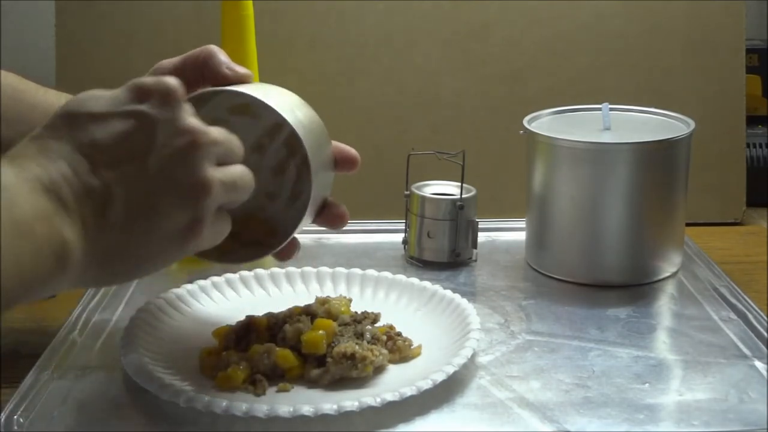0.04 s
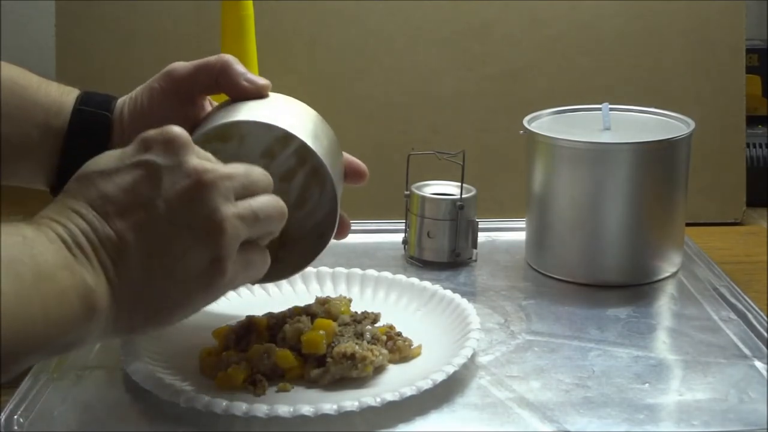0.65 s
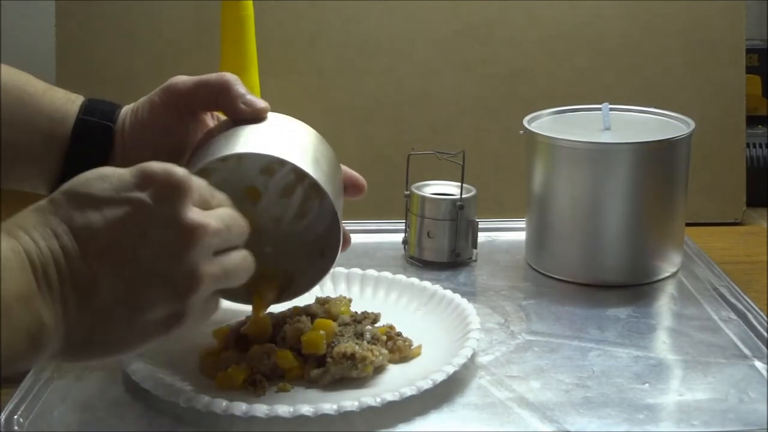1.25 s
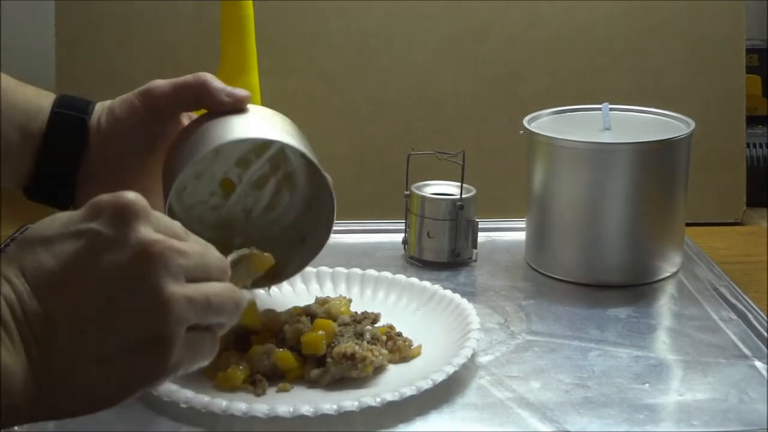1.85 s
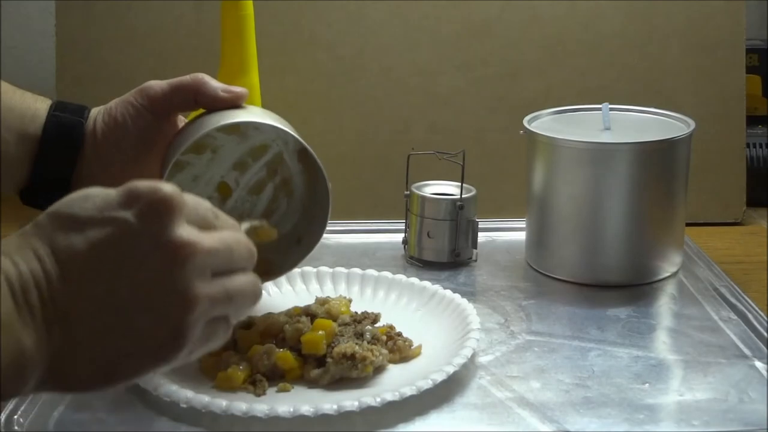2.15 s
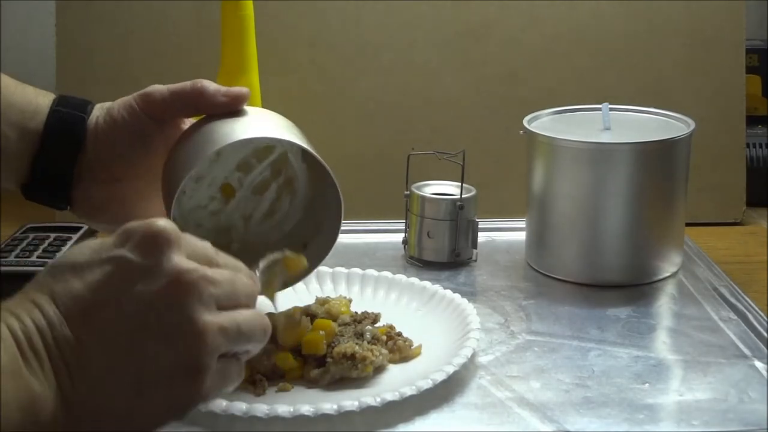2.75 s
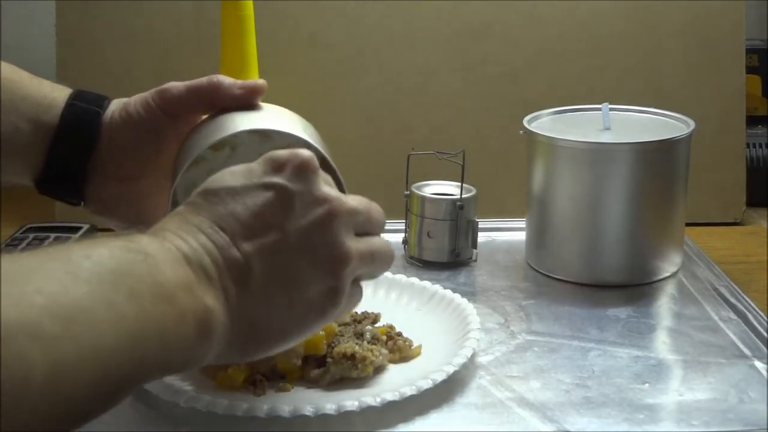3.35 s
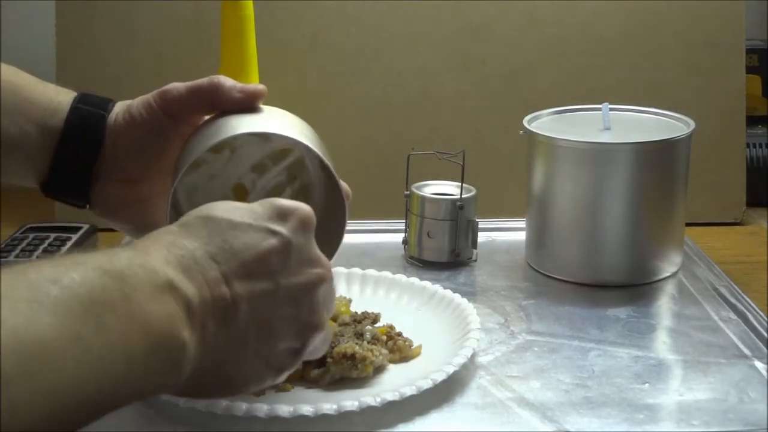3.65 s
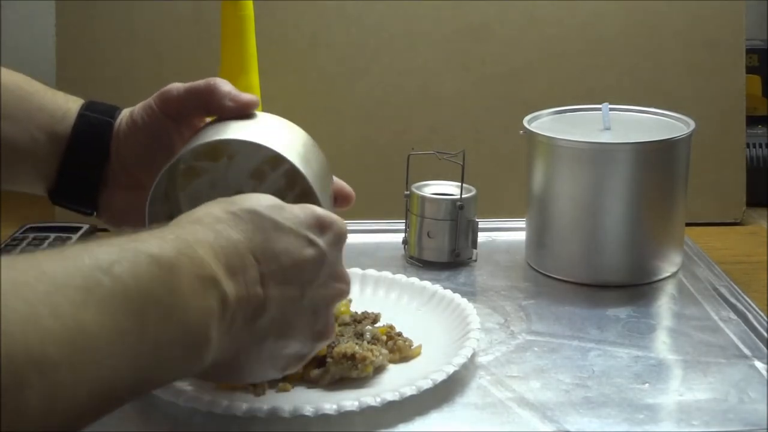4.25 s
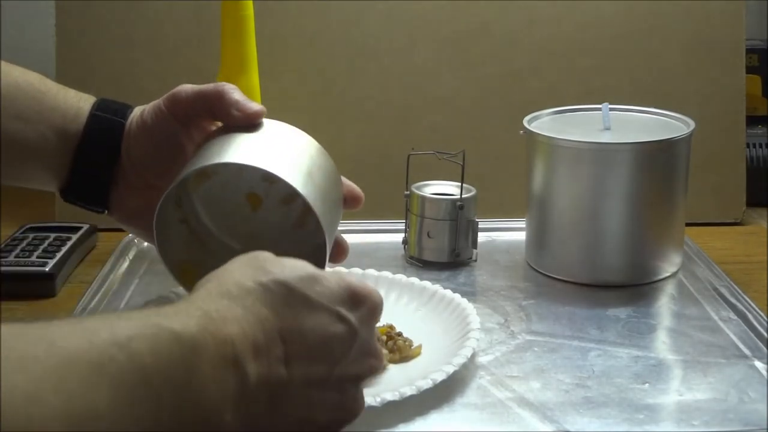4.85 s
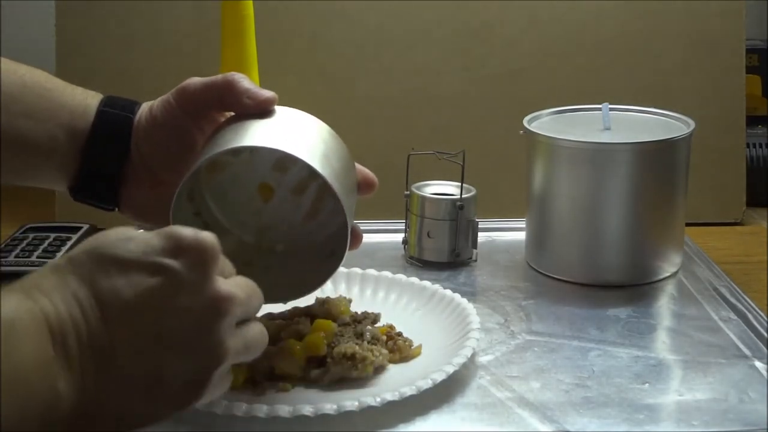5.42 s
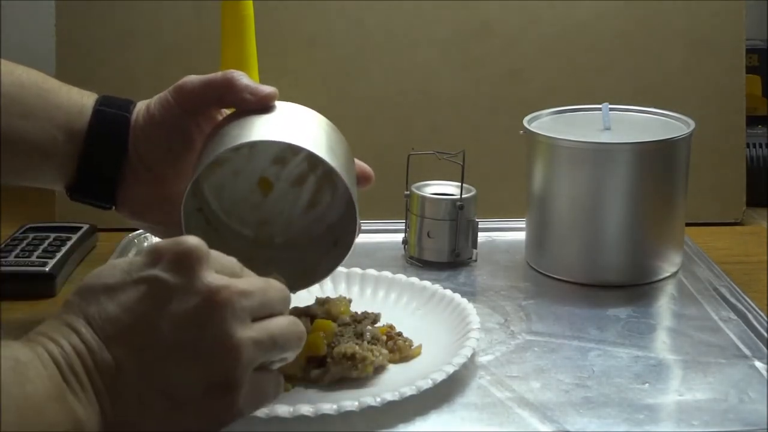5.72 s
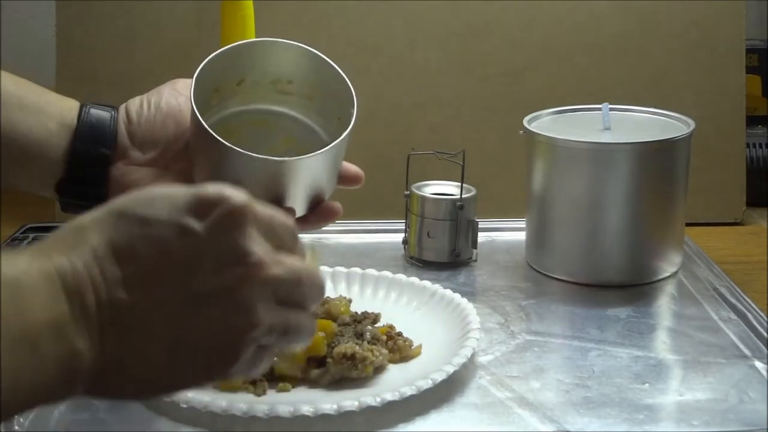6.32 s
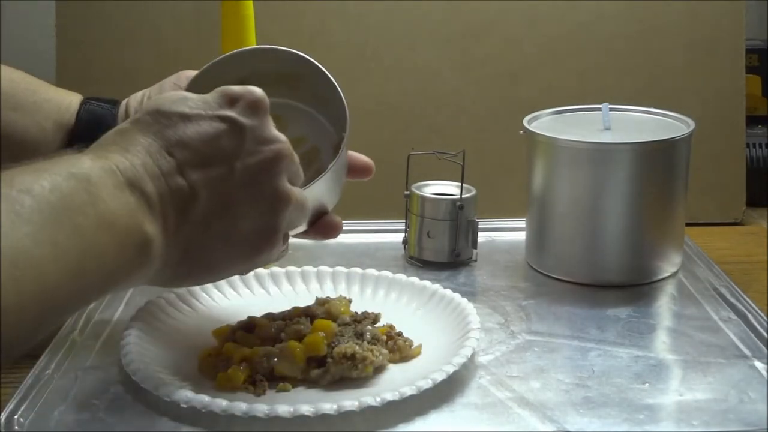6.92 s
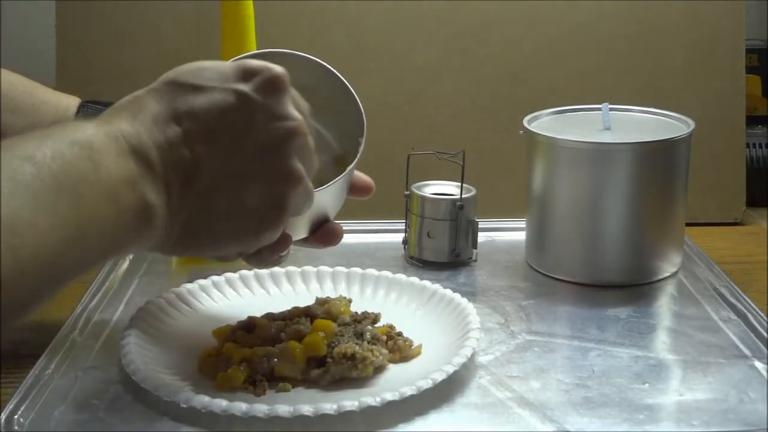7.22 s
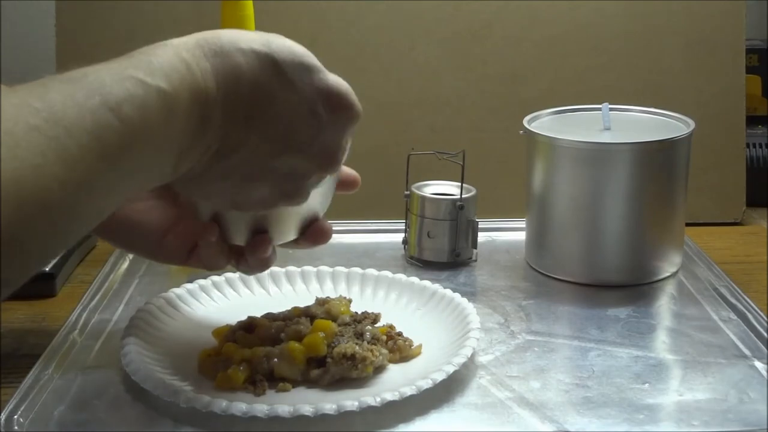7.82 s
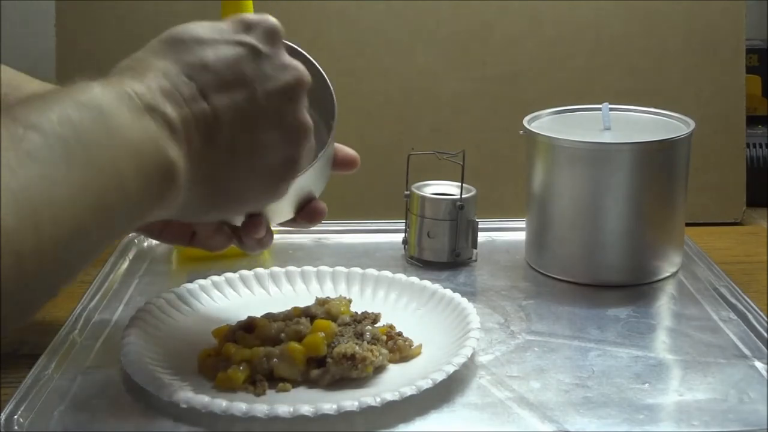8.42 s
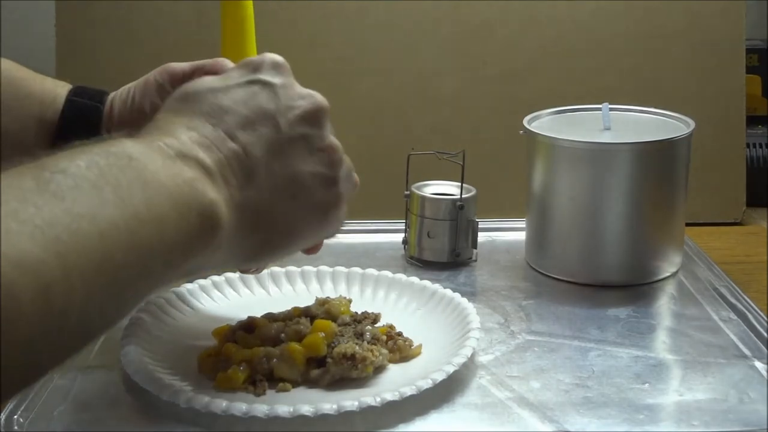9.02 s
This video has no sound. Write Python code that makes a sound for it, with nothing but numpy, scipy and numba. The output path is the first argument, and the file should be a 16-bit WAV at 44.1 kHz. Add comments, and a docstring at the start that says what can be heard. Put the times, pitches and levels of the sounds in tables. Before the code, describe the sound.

Close by in a small room, a metal spoon knocks and drags inside a hand-held aluminum bowl, each gritty stroke giving a short, damped ring. The scrapes come in irregular bunches, with a faint, muffled rustle of food and fingers. After a pause of about a second, the spoon returns with a hollower, skipping scrape and more clinks. A soft, steady whirring hiss lies behind it all.

```python
"""A sharp tap, then scrape after scrape: a metal spoon clears food from a small aluminium dish.
The spoon knocks as it lands and drags in tiny slips that ring the dish, whose modes the hand damps.
The dish is first tipped over a plate, later cupped upright, where it sounds hollower and the spoon skips.
Food and fingers rustle dully; the room is small, and a faint whirring hiss lies underneath."""
import sys
import numpy as np
from scipy import signal
from scipy.fft import rfft, irfft
from scipy.io import wavfile
from numba import njit

SR = 44100
rng = np.random.default_rng(int(sys.argv[2]) if len(sys.argv) > 2 else 0)


def inscribe(sig):
    """Save sig as 16-bit PCM at rate SR to the path in sys.argv[1].

    A 1-D sig is mono; a 2-D sig holds one channel per row.
    Samples are clipped to [-1, 1] before scaling.
    """
    pcm = np.round(np.clip(np.atleast_2d(sig).T, -1, 1) * 32767)
    wavfile.write(sys.argv[1], SR, pcm.astype(np.int16))


N = 404397
UPRIGHT_S = 6.2  # from here on the dish is cupped upright
RELEASE_S = .016  # decay time as the spoon lifts off


def scrapes():
    """Each push drives the dish with stick-slip friction; its speed sets the level and the brightness."""
    # pushes of the spoon: t/s, attack/s, length/s, ring level/dB, swell from start to end/dB,
    # hollow/dB, rasp/dB, grit/dB (all three relative to the ring), hollow f/Hz, ring f/Hz
    pushes = [ (0.0, 0.001, .14, -33, -18, -11, -13, -3.5, 910, 2830),
              (0.175, 0.0085, 0.059, -41, -10, 1, -15, -4.5, 680, 2600),
              (0.26, 0.021, 0.087, -43, -7, -7.5, -13, 0, 743, 3800),
              (0.6, 0.0098, 0.071, -41.5, -11, 1, -3.5, -2, 980, 3300),
              (0.8, 0.066, 0.2, -41, 5, -1.5, -6.5, -0.5, 797, 3550),
              (1.32, 0.014, .31, -43, 5.5, 3, 2.5, -0.5, 930, 3400),
              (2.38, 0.018, .11, -50, 4.5, -2.5, 2, 1, 810, 2870),
              (2.51, 0.016, 0.11, -35.5, 2, -9, 0.5, 2.5, 800, 2783),
              (3.445, 0.067, .165, -37.5, 0, -9.5, -13.5, -2.5, 790, 3363),
              (3.63, 0.032, .14, -40, -5.5, -0.5, -2.5, -3.5, 760, 3420),
              (3.98, 0.0048, 0.18, -38.5, -6.5, -5.5, 0.5, -1.5, 830, 2842),
              (4.28, 0.058, 0.16, -37, 4, -4, -2, 3, 811, 2920),
              (4.7, 0.019, 0.23, -36, 6, 1, 0.5, 2, 820, 2920),
              (5.33, 0.0092, 0.12, -44.5, -5, -3.5, -4.5, 0, 782.7, 2383),
              (5.44, 0.038, .2, -43.5, -0.5, 9, 0.5, 2.5, 844, 2630),
              (5.61, 0.034, 0.069, -30.5, 5, -5.5, 0.5, -2, 901.4, 2630),
              (6.854, 0.0084, 0.068, -31, -11, 0.5, 5.5, -7, 960, 2640),
              (6.94, 0.083, 0.13, -30, -8.5, 1, -7.5, -9, 877, 3660),
              (7.39, 0.022, 0.1, -43, -1, 0.5, -5, -6.5, 907, 3650),
              (7.54, 0.006, 0.19, -45, 4.5, -3.5, -9, -4, 713, 3160),
              (7.76, 0.073, .39, -35, 10.5, -2.5, -11, -7.5, 734.6, 2700),
              (8.158, 0.0095, .085, -33, -0.5, 4, -7, -6, 744, 2900),
              (8.27, 0.032, 0.074, -34, -4, -12, -16.5, -5, 780, 2251),
              (8.645, 0.0057, 0.089, -32, -8.5, 5.5, 2, -4.5, 930, 3173),
              (8.74, 0.013, 0.079, -32, -8.5, 2, -8, -2, 818.4, 3370),
              (8.89, 0.054, 0.087, -36.5, 4, 3, -6.5, 0, 846, 3400), ]
    hollow_follows, grit_follows = .78, 1.09  # dB per dB of speed: faster is brighter
    out = np.zeros((2, N))
    for s, attack_s, length_s, db, swell_db, hollow, rasp, grit, hollow_hz, ring_hz in pushes:
        lead_s = .22 * attack_s  # the hollow tone swells slightly ahead of the brighter scrape
        t = np.arange(max(-lead_s, -s), length_s + 3 * RELEASE_S, 1 / SR)
        force = friction(len(t), slip_hz=650, spread_db=4, smooth_db=-2.5, judder_db=2.5)
        if s > UPRIGHT_S:
            force *= skipping(len(t))
        speed_db = stroke_db(t, attack_s, length_s, swell_db)
        early_db = stroke_db(t + lead_s, attack_s, length_s, swell_db)
        spots = int(np.ceil(len(t) / SR / .13))  # the spoon spends up to .13 s on each spot of the wall
        for part in np.array_split(np.arange(len(t)), spots):
            zones = dish(s, scatter_db=2.2, mode_db=3.5, ripple_db=3.5)
            pace_db = speed_db[part]
            levels_db = (db + hollow + hollow_follows * early_db[part], db + rasp + pace_db,
                         db + pace_db, db + grit + grit_follows * pace_db)
            sound = contact(force[part], zones, levels_db, hollow_hz, ring_hz, hollow_width_hz=183)
            add(out, s + t[part[0]], sound)
    return out


def stroke_db(t, attack_s, length_s, swell_db):
    """Speed of the spoon: it engages, gains or loses pace steadily, then lifts off."""
    engage = np.clip(t / max(attack_s, 1e-3), 1e-3, 1)
    swell = undb(swell_db * (np.minimum(t / length_s, 1) - .5))
    lift = np.exp(-np.maximum(t - length_s, 0) / RELEASE_S)
    return 20 * np.log10(engage * swell * lift)


def friction(n, slip_hz, spread_db, smooth_db, judder_db):
    """Stick and slip: uneven jerks over a fine smooth rub, while the spoon's pressure judders."""
    gap, strength = rng.standard_normal((4000, 2)).T
    at = (np.cumsum(np.exp(.6 * gap)) * SR / slip_hz).astype(int)
    slips = np.bincount(at[at < n], undb(spread_db * np.clip(strength[at < n], -2, 2)), n)
    force = unit(slips) + undb(smooth_db) * rng.standard_normal(n)
    return unit(force * undb(judder_db * wander(n, 70.05)))


def skipping(n, rate_hz=35, rate_spread=.15, depth_db=11):
    """The spoon catches sharply and lets go, again and again, almost regularly."""
    skips = np.cumsum(rate_hz * (1 + rate_spread * wander(n, 17.7))) / SR
    return unit(undb(-depth_db * (skips % 1)))


def taps(size=4096):
    """A hard first contact, then the spoon chatters briefly against the wall."""
    # the spoon lands or catches: t/s, ring level/dB, hollow/dB, grit/dB (both relative to the ring),
    # chatter decay/s, ring f/Hz
    landings = [(0.0533, -11, -26, -3.5, 0.0027, 2830), (0.171, -20, -27, -6.5, 0.012, 2600),
                (0.585, -22.5, 4.5, -3, 0.0062, 2900), (1.302, -19, -4.5, 3, 0.0035, 3880),
                (1.405, -30, -13, 5.5, 0.011, 4400), (2.3434, -16.5, -11.5, -0.5, 0.0039, 3240),
                (2.523, -24.5, -17, 3, 0.0081, 3800), (2.605, -28, -2.5, 5, 0.007, 4100),
                (3.289, -24.5, -5.5, 2, 0.0042, 3430), (3.597, -26.5, -5.5, -1, 0.011, 3200),
                (3.670, -22, -12, 1.5, 0.0056, 3270), (3.966, -17.5, 1.5, -5, 0.016, 3495),
                (4.025, -20, -7, -3, 0.0026, 3582), (4.168, -26.5, -15, -4, 0.0062, 2370),
                (4.216, -20, -10, -5.5, 0.0046, 2620), (4.287, -30, -28, -15, 0.0058, 2400),
                (4.689, -28.5, -10, -1.5, 0.0056, 3740), (4.9186, -21, 3.5, 5, .0036, 3920),
                (5.3054, -17.5, -11.5, -4.5, 0.0087, 3400), (6.797, -24.5, 5, -9.5, .012, 2538),
                (6.8555, -15.5, -2, -12.5, 0.0052, 2400), (6.897, -16, -13, -6.5, 0.0094, 2600),
                (6.984, -25.5, 3.5, -0.5, 0.012, 3300), (7.024, -24, -15, 5.5, 0.017, 3100),
                (7.390, -45, 9, -5, 0.0098, 2800), (7.548, -32, -12, -5.5, 0.02, 4000),
                (7.628, -24.5, -32, -23, 0.0045, 3030), (7.8418, -29.5, -18, -2, 0.0041, 2291),
                (8.0172, -36, -11, 5, .003, 3406), (8.078, -19.5, -34, -26, 0.0057, 2703),
                (8.5956, -21.5, 9, -6, 0.0097, 2520), (8.65, -16, -3.5, -9, 0.01, 2314),
                (8.696, -35.5, 20, -21.5, 0.012, 2600)]
    onset_s = .00008  # a tiny ramp softens the onset of each tap
    out, t = np.zeros((2, N)), np.arange(size) / SR
    for s, db, hollow, grit, chatter_s, ring_hz in landings:
        chatter = rng.standard_normal(size) * undb(5.47 * rng.standard_normal(size) - 5.5)
        force = chatter * np.exp(-t / chatter_s)
        force[0] += 4.5  # the first hit
        force *= 1 - np.exp(-(t + 1 / SR) / onset_s)
        zones = dish(s, scatter_db=3.0, mode_db=0.5, ripple_db=5.0)
        levels_db = (db + hollow, db + hollow / 2 - 3.5, db, db + grit)
        add(out, s, contact(force, zones, levels_db, hollow_hz=930, ring_hz=ring_hz, hollow_width_hz=143))
    return out


def dish(s, scatter_db, mode_db, ripple_db, size=4096):
    """Responses of the hollow, rasp, ring and grit zones; every contact spot weights the modes anew."""
    # modes of the dish: f/Hz, nominal width/Hz, level tipped/dB, level cupped upright/dB
    modes = [(504, 71, 5, 12), (615.6, 48, 10.5, 32.5), (766, 18.6, 14, 40), (934, 10, 2, 30),
             (813.4, 94, -18, 31), (970, 3.7, -17.5, 36.5), (1010, 13, -21, 33), (1110, 33, 13.5, 32.5),
             (1207, 37, 6, 6), (1457, 23.4, 7.5, 25), (1533, 14, 7, 7), (1692, 24, -2, 18),
             (1720, 21, -18, 24), (1850, 9.3, 3.5, 20.5), (2298, 68, 13, 24.5), (2440, 10, 6, 14),
             (2488, 30, -14, 17), (2808, 45, 6, 22), (2986.7, 32, -8, 18.5), (3203, 43, 9, 9),
             (3412, 70, 7.5, 15.5), (3585, 24, 7, 20), (4073, 49, 13, 21), (4240, 120, 7, 20.5),
             (4690, 135, 9, 12), (5505, 460, 11.5, 12), (6105, 70, 3.5, 12), (7150, 390, 5, -24),
             (7460, 250, 2, 7.5), (8000, 240, 5, 6.5), (9760, 1160, 3.5, 7), (11970, 150, 3.5, 8.5)]
    # the dense, well damped vibration between the modes, which tilts them too: f/Hz, level/dB
    body = [(100, -70), (330, -11.5), (470, -7.5), (620, -5.5), (800, -6), (1300, -2.5), (2500, -5),
            (5000, -7), (9000, -10.5), (15500, -12.5)]
    # crossovers between the four zones: f/Hz
    edges = (1150, 2000, 5000)
    hz = np.arange(size // 2 + 1) * SR / size
    mode_hz, width, tipped_db, upright_db = np.transpose(modes)
    held_db = upright_db if s > UPRIGHT_S else tipped_db
    db = held_db + mode_db + scatter_db * rng.standard_normal(len(modes))
    power = 1 + resonance(hz[:, None], mode_hz, 1.78 * width) ** 1.16 @ undb(db) ** 2
    # higher up, the crowded modes of spoon and wall form peaks of their own at each spot
    crowd = np.interp(hz, np.linspace(0, SR / 2, 220), rng.standard_normal(220))
    gain = np.sqrt(power) * eq_curve(body, hz) * undb(ripple_db * crowd * np.minimum(hz / 4000, 1))
    below = [np.zeros_like(hz)] + [1 / (1 + (hz / edge) ** 16) for edge in edges] + [np.ones_like(hz)]
    zones = [minimum_phase(gain * np.sqrt(share + 1e-9)) for share in np.abs(np.diff(below, axis=0))]
    return [zone / np.sqrt(np.sum(zone ** 2)) for zone in zones]


def contact(force, zones, levels_db, hollow_hz, ring_hz, hollow_width_hz):
    """One contact force drives all four zones of the dish, heard through the room."""
    hollow_drive = springy_tip(force, zones[0], hollow_hz, hollow_width_hz)
    ring_drive = springy_tip(force, zones[2], ring_hz, width_hz=2300)
    drives = (hollow_drive, force, ring_drive, force)
    metal = sum(signal.fftconvolve(x * undb(db), zone) for x, db, zone in zip(drives, levels_db, zones))
    return room(metal, t60_low_s=0.36, t60_high_s=0.28, wet_db=-2.0, side_db=-9.5)


def springy_tip(force, zone, centre_hz, width_hz):
    """The springy contact feeds the same power into the modes around its own resonance."""
    power = np.abs(rfft(zone)) ** 2
    hz = np.arange(len(power)) * SR / len(zone)
    share = resonance(hz, centre_hz, width_hz) @ power / power.sum()
    return bandpass(force, float(centre_hz), float(width_hz)) / np.sqrt(share)


def rubs():
    """Soft food and shifting fingers add a dull, uneven rustle."""
    # spells of rubbing: start t/s, end t/s, level/dB
    spells = [(0.101, 0.347, -66), (1.303, 1.7, -66.5), (4.101, 5.0, -66.5), (5.378, 5.79, -55.5),
              (7.301, 8.503, -59)]
    # their muffled tone: f/Hz, level/dB
    colour = [(20, -16.5), (60, -8.5), (150, -13.5), (280, -5.5), (420, 3), (600, 3.5), (1200, -60),
              (4000, -60)]
    out, gain = np.zeros((2, N)), eq_curve(colour, np.arange(SR + 1) / 2)
    for start_s, end_s, db in spells:
        n = int((end_s - start_s) * SR)
        noise = shaped_noise(2 * SR, gain)[:n]
        rustle = unit(noise * np.hanning(n) ** .5 * undb(3.0 * wander(n, 24.5)))
        add(out, start_s, rustle[None] * undb(db))
    return out


def room(x, t60_low_s, t60_high_s, wet_db, side_db):
    """Direct sound, near echoes and a short tail much alike at both ears."""
    # echoes from the tray and the back board: delay t/s, level/dB
    echoes = [(.0013, -8), (.0042, -18.5), (.0092, -4)]
    t = np.arange(SR // 3) / SR
    noise = rng.standard_normal((2, len(t)))
    low = signal.sosfilt(signal.butter(1, 4000, fs=SR, output="sos"), noise)
    tail = low * undb(-60 * t / t60_low_s) + 1.405 * (noise - low) * undb(-60 * t / t60_high_s)
    tail *= 1 - np.exp(-t / 0.00091)
    mid, side = undb(wet_db) * tail / np.sqrt(np.sum(tail ** 2, axis=1, keepdims=True))
    side = undb(side_db) * signal.sosfilt(signal.butter(1, 7500, fs=SR, output="sos"), side)
    mid[0] += 1  # direct sound
    for delay_s, db in echoes:
        path_s = delay_s * np.exp(.12 * rng.standard_normal())  # the paths change as the dish moves
        mid[int(path_s * SR)] += undb(db)
    response = np.array([mid + side, mid - side]) / np.sqrt(np.sum(mid ** 2))
    return signal.fftconvolve(x[None], response, axes=1)


def room_air(level_db=-59):
    """A near-steady bed of air, with a whirr around 2 kHz, a fainter hump above it, and a low resonance of the
    room near 360 Hz."""
    # tone of the air: f/Hz, relative level/dB
    air = [(15, -7), (25, -7.5), (50, -14), (130, -12.5), (350, -13.5), (500, -14), (1100, -20),
           (1700, -24), (3100, -22.5), (4800, -27), (8500, -28.5), (13000, -30), (15500, -26.5)]
    # humps of the whirr, and the room's low resonance near 360 Hz: f/Hz, nominal width/Hz, relative level/dB
    peaks = [(2200, 200, -4), (4205, 500, -15.5), (359, 13, -10.5)]
    # stereo width: f/Hz, side minus mid/dB
    spread = [(25, -25.5), (60, -15), (130, -3.5), (300, 1.5), (1000, 10), (2200, -4.5), (5000, -2.5),
              (12000, -15)]
    hz = np.arange(N // 2 + 1) * SR / N
    humps = sum(undb(db) * resonance(hz, f, 1.49 * width) ** 2 for f, width, db in peaks)
    gain = eq_curve(air, hz) + humps
    mid = shaped_noise(N, gain)
    side = shaped_noise(N, gain * eq_curve(spread, hz))
    return np.array([mid + side, mid - side]) / np.std(mid) * undb(level_db + .5 * wander(N, 1.7))


def undb(db):
    """Decibels to amplitude."""
    return 10 ** (np.asarray(db) / 20)


def unit(x):
    """Scale to an RMS of 1."""
    return x / np.sqrt(np.mean(x ** 2))


def eq_curve(points, hz):
    """Gain of an (f/Hz, level/dB) outline at the given frequencies."""
    f, db = np.transpose(points)
    return undb(np.interp(np.log(hz + 1), np.log(f), db))


def shaped_noise(n, gain):
    """White noise coloured by one gain per frequency bin."""
    return irfft(rfft(rng.standard_normal(n)) * gain, n)


def resonance(hz, centre_hz, width_hz):
    """Power response of one resonance."""
    return 1 / (1 + (2 * (hz - centre_hz) / width_hz) ** 2)


@njit
def bandpass(x, centre_hz, width_hz):
    """State-variable resonance with unity gain at its centre."""
    y, band, low = np.empty(len(x)), 0., 0.
    tuning, damping = np.tan(np.pi * centre_hz / SR), width_hz / centre_hz
    for i in range(len(x)):
        swing = (band + tuning * (x[i] - low)) / (1 + tuning * (tuning + damping))
        band, low = 2 * swing - band, low + 2 * tuning * swing
        y[i] = damping * swing
    return y


def minimum_phase(gain):
    """The tightest causal impulse response with this magnitude."""
    cepstrum = irfft(np.log(gain + 1e-9))
    half = len(cepstrum) // 2
    cepstrum[1:half] *= 2
    cepstrum[half + 1:] = 0
    return irfft(np.exp(rfft(cepstrum)))


def wander(n, rate_hz):
    """Smooth random drift with a spread near 1."""
    return np.interp(np.arange(n) * rate_hz / SR, np.arange(4096), rng.standard_normal(4096))


def add(track, s, sound):
    """Mix a sound into the stereo track at time s."""
    start = max(int(s * SR), 0)
    track[:, start:start + sound.shape[1]] += sound[:, :N - start]


def scene():
    """Spoon, dish and food over the room air."""
    return scrapes() + taps() + rubs() + room_air()


def record(dry):
    """A steep high cut at 15.9 kHz takes off the very top."""
    return signal.sosfilt(signal.ellip(10, .2, 80, 15900, fs=SR, output="sos"), dry)


dry = scene()
out = record(dry)
inscribe(out)
```